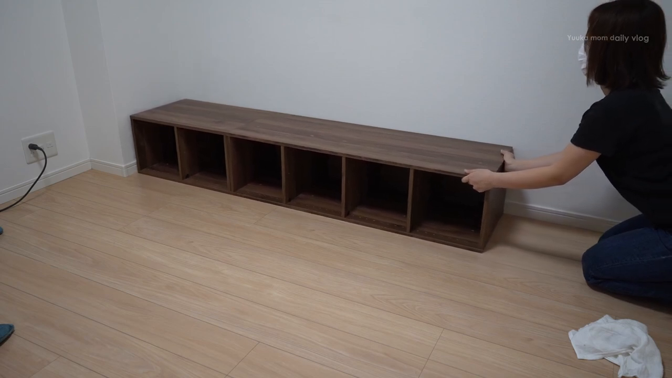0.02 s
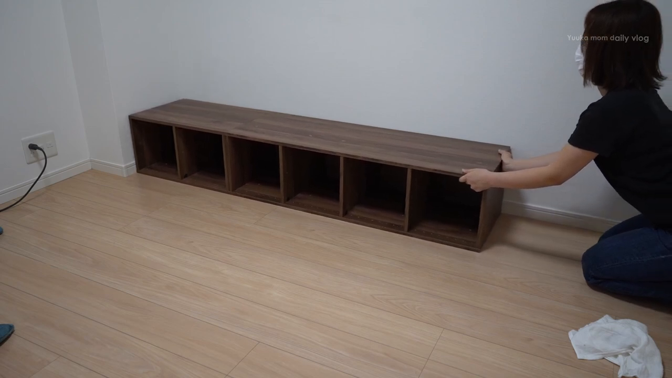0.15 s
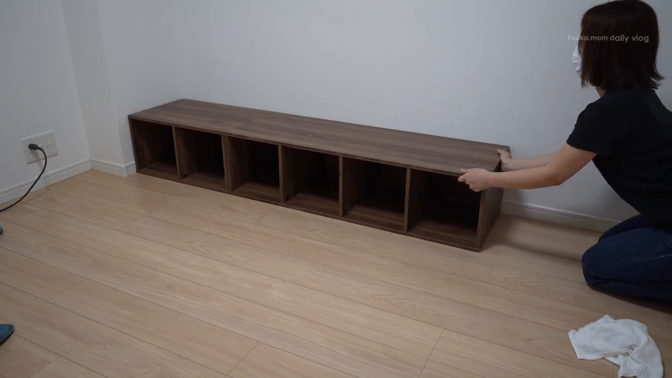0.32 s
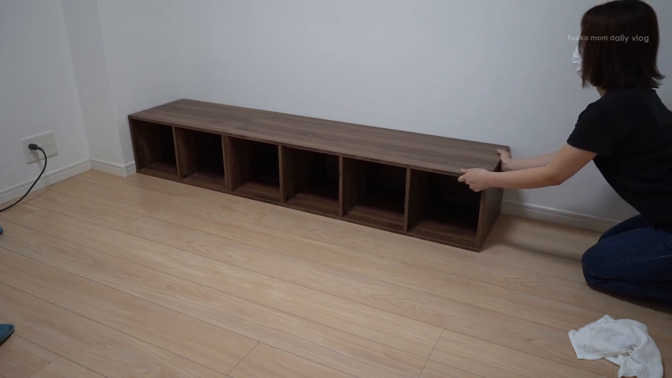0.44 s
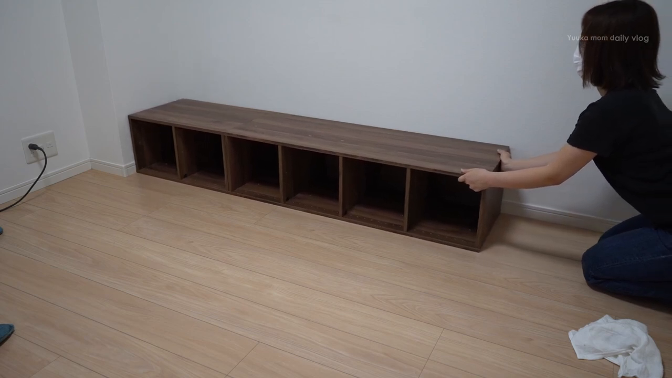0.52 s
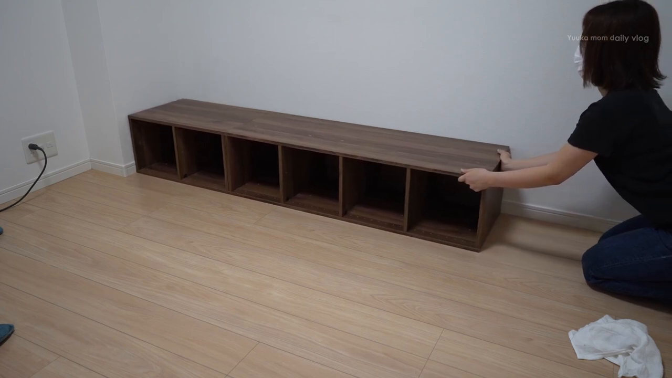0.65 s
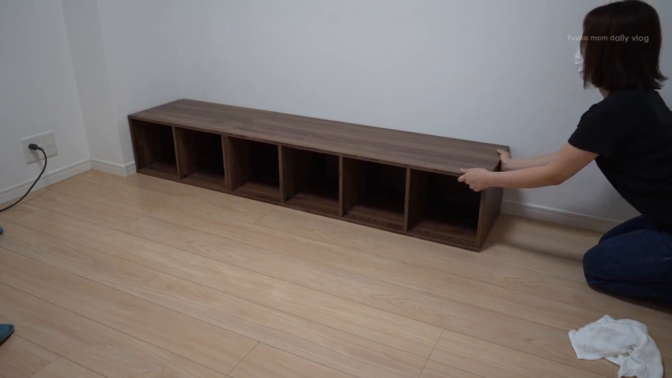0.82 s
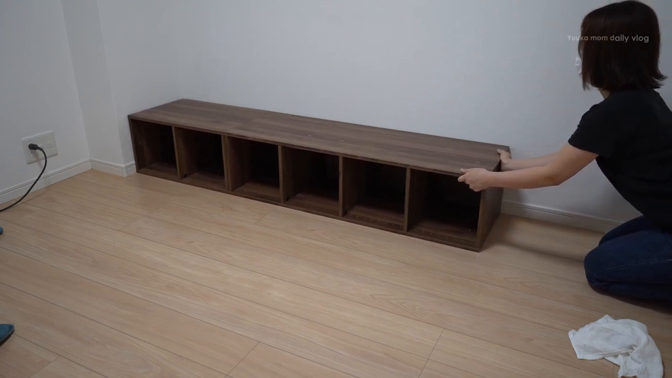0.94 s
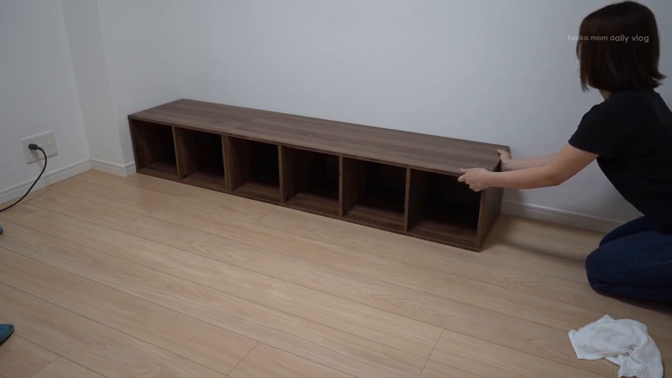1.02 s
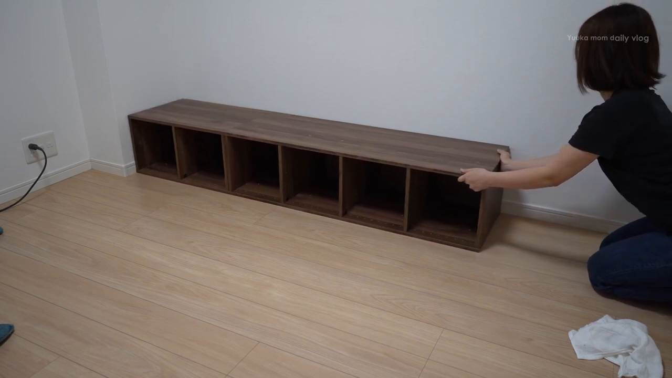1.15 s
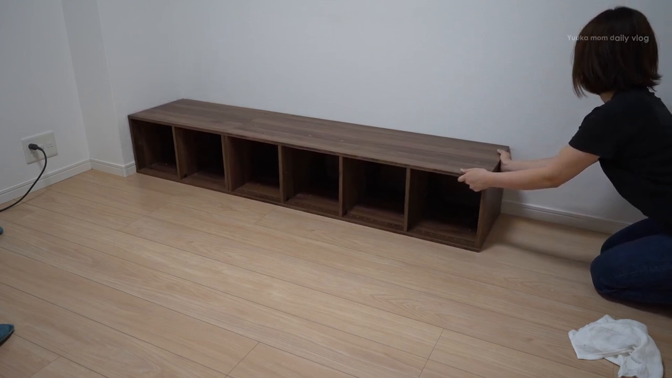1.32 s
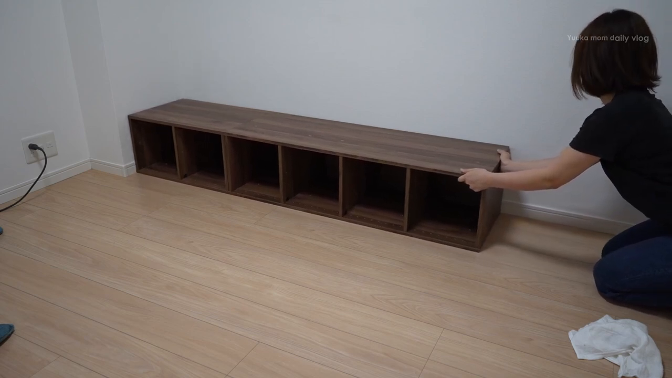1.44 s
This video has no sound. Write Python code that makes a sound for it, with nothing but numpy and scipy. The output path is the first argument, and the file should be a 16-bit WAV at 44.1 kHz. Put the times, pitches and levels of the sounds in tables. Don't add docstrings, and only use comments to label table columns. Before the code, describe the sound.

A long wooden shelf scrapes over a laminate floor, knocks the wall sharply, then drags back softly.

```python
import sys
import numpy as np
from scipy import signal
from scipy.fft import rfft, irfft, next_fast_len
from scipy.io import wavfile
from scipy.ndimage import uniform_filter1d

SR = 44100
rng = np.random.default_rng(int(sys.argv[2]) if len(sys.argv) > 2 else 0)


def dump(signal):
    limited = np.clip(np.atleast_2d(signal).T, -1, 1)
    pcm = np.round(limited * 32767).astype(np.int16)
    wavfile.write(sys.argv[1], SR, pcm)


def natural_amplitude(level_db):
    exponent = np.asarray(level_db, float) / 20
    return 10 ** exponent


N = 63945

# time_s, level_db
PUSH = [
    (0, -50),
    (.07, -50.5),
    (.15, -52),
    (0.209, -53.5),
    (.225, -70),
]
# freq_hz, density_db_per_hz
PUSH_GRIT = [(250, -9.5), (500, -10.5), (1000, -4.5), (1500, -1.5), (2700, -4), (4000, -11), (7600, -14.5),
             (15500, -29.5)]
# time_s, grit_db, judder_db
DRAG = [(.615, -68, -71), (0.639, -71.5, -75), (.75, -78, -63.5), (0.818, -68, -65), (.95, -62.5, -67),
        (1.05, -61, -70), (1.13, -60, -64.5), (1.22, -60, -74), (1.3, -58.5, -64.5), (1.418, -57.5, -79),
        (1.45, -56.5, -87)]
# freq_hz, density_db_per_hz
DRAG_GRIT = [(400, 1), (900, -4), (1500, -6.5), (2000, -1), (4000, -2.5), (7000, -3.5), (10000, -7.5),
             (15500, -21.5)]
GRAINS_PER_S, GRAIN_SPREAD_DB, PATCHY_DB = 13000, 1.3, 0.6
SILENT_DB = -140

# mode_hz, level_db, t60_s
RESTING = [(156.6, -10, 0.3), (187, 1, 0.22), (214, -1.5, 0.22), (302, -4, 0.31), (338, -2, 0.27),
           (380.5, -6, .15), (502, -1.5, 0.2), (588, -3.5, 0.16), (710, -6, 0.087)]
# start_s, level_db, contact_ms, board_hz
NUDGES = [(0.634, -58.5, 0.77, 367), (0.696, -72, 1.4, 336.4), (0.769, -59.5, 0.97, 404),
          (0.786, -47, 2.3, 207), (0.813, -69.5, 2.9, 170), (0.859, -58, 3.26, 214), (.955, -61, 2, 338),
          (1.099, -57.5, 1.9, 250), (1.13, -66.5, 2.8, 187), (1.166, -64, 3.6, 187), (1.2, -53.5, 2.5, 198),
          (1.225, -54, 3.2, 187), (1.261, -53.5, 2.4, 187), (1.3, -73, 3.3, 338), (1.33, -58, 3.3, 200),
          (1.39, -68, 1.8, 338)]
PUSH_JUDDER_DB, JUDDER_TOP_HZ = -64.5, 526
NUDGE_SWELL_T60_S, AIM_DB_PER_OCTAVE = 0.0089, 8.5

# freq_hz, density_db_per_hz
AIR = [(25, -12), (66, -9), (119, -16), (200, -6), (350, -8), (1100, -15), (2600, -32), (15500, -36)]
AIR_DB, HUM_HZ, HUM_DB = -70, 59.8, -73.5

# mode_hz, level_db, t60_s
BOARDS = [(67, -16, .14), (153.2, -3, 0.3), (187, -3, 0.26), (214, -2, 0.31), (277.5, -5.5, 0.19),
          (339.5, -1.5, 0.28), (382, -18, 0.39), (455, -25, 0.1), (556, -14, 0.23), (580, -18, 0.59),
          (659, -4.5, 0.41), (703.6, -11, 0.56), (804.2, -3, 0.21), (1040, -25, 0.15)]
# start_s, blow_db, contact_ms, crack_db
JOLTS = [
    (.2145, -37.5, 0.62, -37.5),
    (0.2189, -29, 0.28, -31),
    (0.2221, -29.5, 1.15, -31),
    (0.2312, -31, 1.6, -40),
    (0.2534, -31, 2.1, -46),
    (0.2864, -38.5, 4.2, -67),
    (.622, -75, 1.6, -78),
]
# freq_hz, density_db_per_hz
CRACK = [(150, -26), (400, 5.5), (700, -3.5), (1500, -8.5), (2900, -16), (4500, -24.5), (9000, -25.5),
         (15500, -33.5)]
SCATTER_DB, CRACK_MS, SWELL_T60_S, BOARD_TURN_RAD = 2.5, 8.18, 0.023, 0.19

# start_s, rise_s, hold_s, fall_s, level_db, centre_hz,
# width_octaves
SLIPS = [
    (0.617, 0.0051, .012, .06, -74, 8800, 0.36),
    (0.614, 0.0096, .04, .2, -70.5, 785, 0.93),
    (0.738, 0.034, 0.017, 0.29, -66.5, 1210, .8),
    (0.762, 0.053, 0.034, 0.064, -65, 12000, 0.31),
]

# freq_hz, side_minus_mid_db
WIDTH = [(40, -42), (110, -18), (250, -25), (500, -9), (1000, -6.5), (2000, -1.8), (5000, 2.1),
         (15000, -2.7)]
# freq_hz, t60_s, tail_minus_direct_db
ROOM = [(99, 0.21, -15), (250, 0.14, -6.5), (756, 0.54, -0.5), (2900, 0.55, 2), (12000, 0.45, 3)]
# freq_hz, left_minus_right_db
BALANCE = [(300, -0.25), (1000, -2), (2000, -0.2), (8000, -3.0), (13000, -0.5)]
ROOM_GAP_MS = 4.0


def table(rows, at, column=1):
    rows = np.array(rows, float)
    return np.interp(np.log(np.maximum(at, 1.)), np.log(rows[:, 0]), rows[:, column])


def colour(x, rows):
    size = next_fast_len(x.shape[-1])
    gain = natural_amplitude(table(rows, np.fft.rfftfreq(size, 1 / SR)))
    return irfft(rfft(x, size) * gain, size)[..., :x.shape[-1]]


def unit(x):
    return x / np.sqrt(np.mean(x ** 2))


def walk(rate_hz):
    k = int(SR / rate_hz)
    steps = np.repeat(rng.standard_normal(N // 50), k)[:N]
    return unit(uniform_filter1d(uniform_filter1d(steps, k), k))


def wide(mid, side):
    side = colour(side, WIDTH)
    return np.array([mid + side, mid - side])


def ring(x, hz, t60_s):
    pole = np.exp(2j * np.pi * hz / SR - np.log(1000) / (t60_s * SR))
    return signal.lfilter([1], [1, -pole], x)


def blow(t, start_s, level_db, contact_ms):
    push = np.sin(np.pi * np.clip((t - start_s) * 1000 / contact_ms, 0, 1)) ** 2
    return push / push.sum() * natural_amplitude(level_db)


def boards(force, modes, chance, swell_s, sign):
    place = np.outer([1, -1], np.sin(2.51 * np.arange(len(modes)))) / 2
    sides = np.exp(2j * BOARD_TURN_RAD * np.roll(place, 1, axis=1))
    out = 0
    for k, (hz, level_db, t60_s) in enumerate(modes):
        gain = sign ** k * natural_amplitude(level_db + SCATTER_DB * chance[k])
        out = out + sides[:, [k]] * gain * (ring(force, hz, t60_s) - ring(force, hz, swell_s))
    return out.imag


def grit(rows):
    chance = rng.random((2, 2, N))
    hits = chance[0] < GRAINS_PER_S / SR
    size = natural_amplitude(-GRAIN_SPREAD_DB * np.log(chance[1] + 1e-9))
    grains = hits * size * rng.standard_normal((2, N))
    return unit(wide(*colour(grains, rows))) * natural_amplitude(PATCHY_DB * walk(24.3))


def resting_shelf(force, modes):
    return boards(force, modes, np.zeros(len(modes)), NUDGE_SWELL_T60_S, 1)


def judder(t, level_db):
    lowpass = signal.butter(2, JUDDER_TOP_HZ, fs=SR, output="sos")
    shake = signal.sosfilt(lowpass, rng.standard_normal(N)) * natural_amplitude(0.5 * walk(41))
    out = resting_shelf(shake * natural_amplitude(level_db), RESTING) / np.std(resting_shelf(shake, RESTING))
    for start_s, nudge_db, contact_ms, board_hz in NUDGES:
        aimed = [(hz, g - AIM_DB_PER_OCTAVE * abs(np.log2(hz / board_hz)), t60_s) for hz, g, t60_s in RESTING]
        out = out + resting_shelf(blow(t, start_s, nudge_db, contact_ms), aimed)
    return out


def air():
    noise = unit(wide(*colour(rng.standard_normal((2, N)), AIR)))
    hum_hz = HUM_HZ * (1 + 0.021 * walk(6.15))
    hum = natural_amplitude(HUM_DB) * np.sin(2 * np.pi * np.cumsum(hum_hz) / SR)
    return natural_amplitude(AIR_DB) * noise + hum


def jolts(t):
    snap = unit(wide(*colour(rng.standard_normal((2, N)), CRACK)))
    chances = rng.standard_normal((len(JOLTS), len(BOARDS)))
    out = 0
    for (start_s, blow_db, contact_ms, crack_db), chance in zip(JOLTS, chances):
        since_ms = (t - start_s) * 1000
        burst = np.clip(since_ms, 0, 1) * np.exp(-np.maximum(since_ms, 0) / CRACK_MS)
        boom = boards(blow(t, start_s, blow_db, contact_ms), BOARDS, chance, SWELL_T60_S, -0.91)
        out = out + boom + natural_amplitude(crack_db) * snap * burst
    return out


def band_bursts(t):
    out = 0
    for start_s, rise_s, hold_s, fall_s, level_db, centre_hz, octaves in SLIPS:
        rise = np.clip((t - start_s) / rise_s, 0, 1)
        fall = np.exp(-np.maximum(t - start_s - rise_s - hold_s, 0) / fall_s * 2)
        hump = [(centre_hz * 2 ** (k * octaves), -3 * k * k) for k in range(-4, 4)]
        swish = unit(wide(*colour(rng.standard_normal((2, N)), hump)))
        out = out + natural_amplitude(level_db) * rise * fall * swish
    return out


def room(x):
    wet = 0
    for hz in 88 * 2. ** np.arange(0, 7.6, .5):
        sos = signal.butter(2, [hz / 2 ** .25, hz * 2 ** .25], "band", fs=SR, output="sos")
        keep = natural_amplitude(-120 / table(ROOM, hz) / SR)
        energy = signal.lfilter([1 - keep], [1, -keep], signal.sosfilt(sos, x.mean(axis=0)) ** 2)
        reflections = unit(wide(*signal.sosfilt(sos, rng.standard_normal(x.shape))))
        wet = wet + natural_amplitude(table(ROOM, hz, column=2)) * np.sqrt(energy) * reflections
    gap = int(ROOM_GAP_MS * SR / 1000)
    return x + np.pad(wet, ((0, 0), (gap, 0)))[:, :x.shape[1]]


def scene():
    t = np.arange(N) / SR
    push_s, push_level_db = np.array(PUSH).T
    drag_s, drag_grit_db, drag_judder_db = np.array(DRAG).T
    push_db = np.interp(t, push_s, push_level_db, right=SILENT_DB)
    drag_db = np.interp(t, drag_s, drag_grit_db, left=SILENT_DB)
    hiss = natural_amplitude(push_db) * grit(PUSH_GRIT) + natural_amplitude(drag_db) * grit(DRAG_GRIT)
    push_judder_db = push_db - push_level_db[0] + PUSH_JUDDER_DB
    judder_db = np.maximum(np.interp(t, drag_s, drag_judder_db), push_judder_db)
    rubbing = hiss + band_bursts(t) + judder(t, judder_db)
    lead = SR // 5
    source = np.concatenate([rubbing[:, lead:0:-1], rubbing + jolts(t)], axis=1)
    heard = room(source)[:, lead:] + air()
    left_eq = [(hz, db / 2) for hz, db in BALANCE]
    right_eq = [(hz, -db / 2) for hz, db in BALANCE]
    return np.array([colour(heard[0], left_eq), colour(heard[1], right_eq)])


def low_pass(x):
    return signal.sosfilt(signal.butter(12, 16400, fs=SR, output="sos"), x)


def record(dry):
    return low_pass(dry)


dry = scene()
out = record(dry)
dump(out)
```